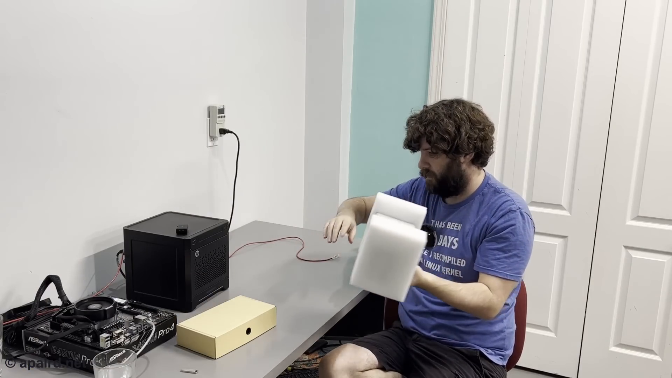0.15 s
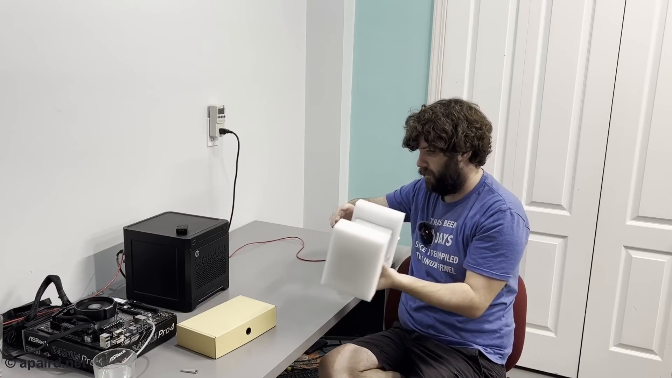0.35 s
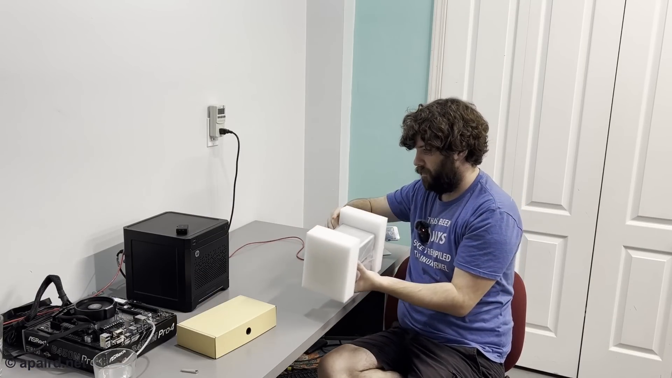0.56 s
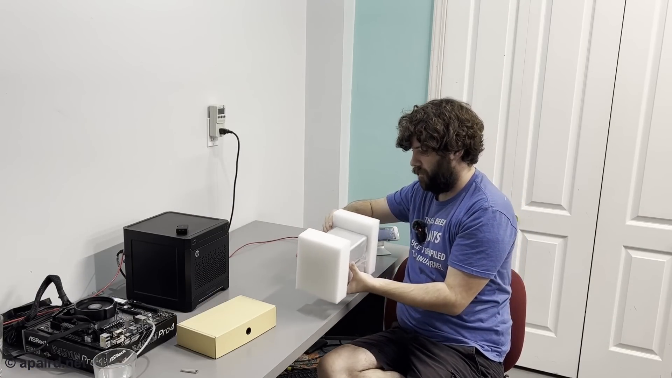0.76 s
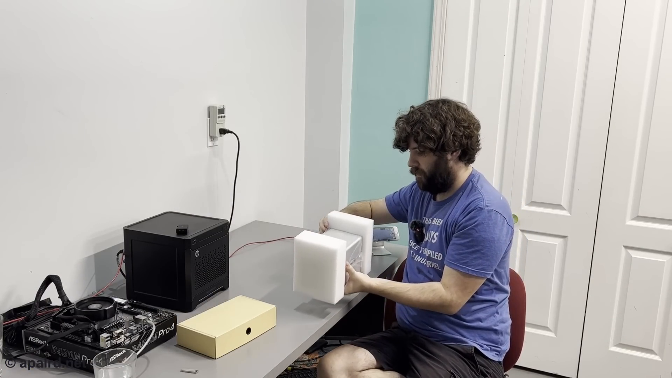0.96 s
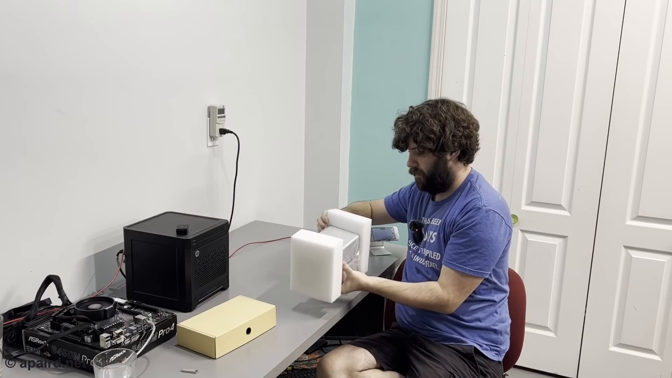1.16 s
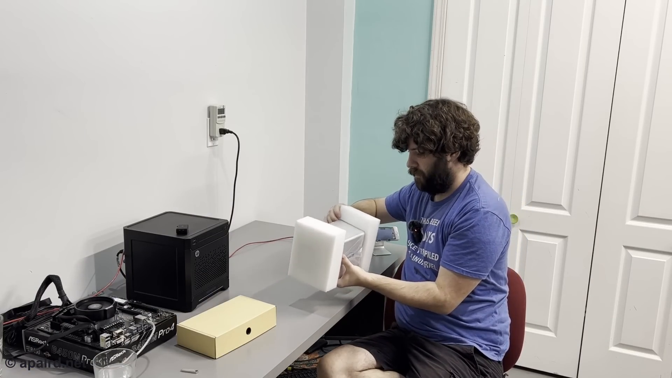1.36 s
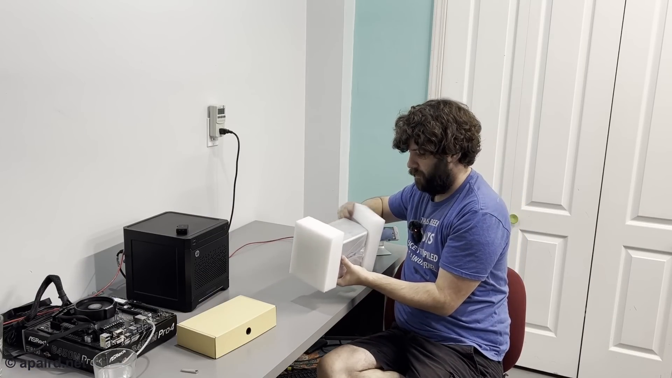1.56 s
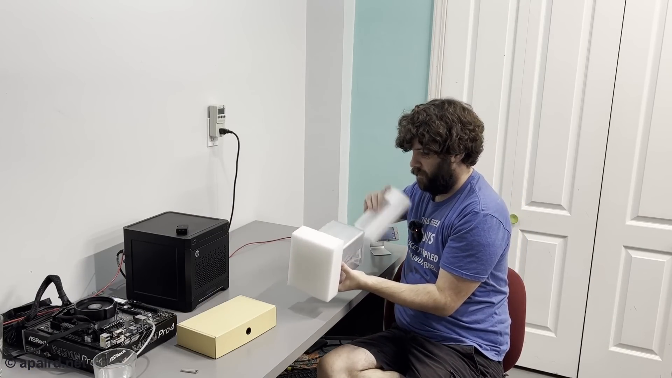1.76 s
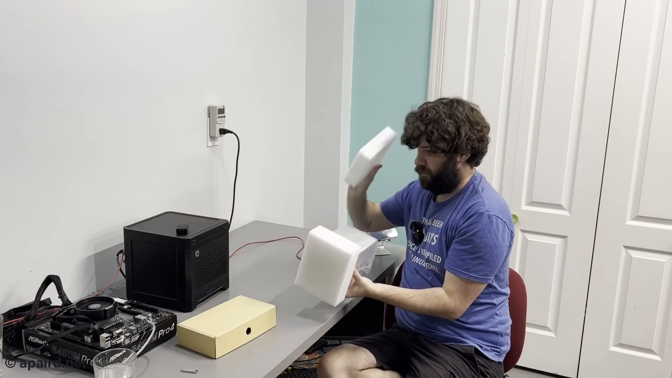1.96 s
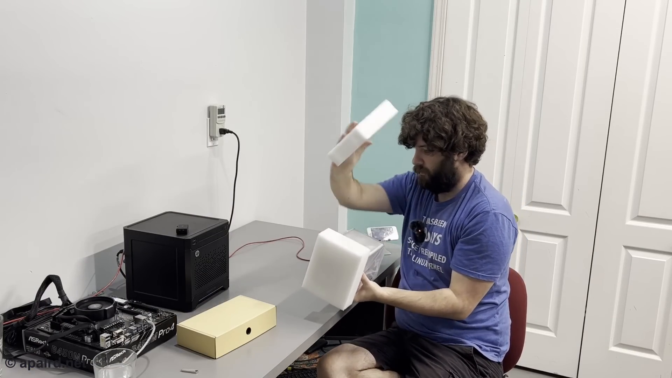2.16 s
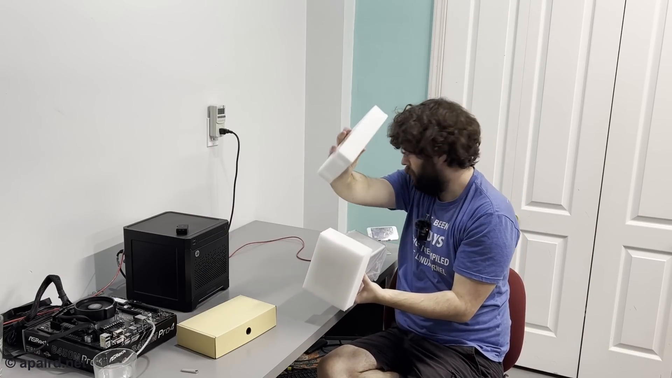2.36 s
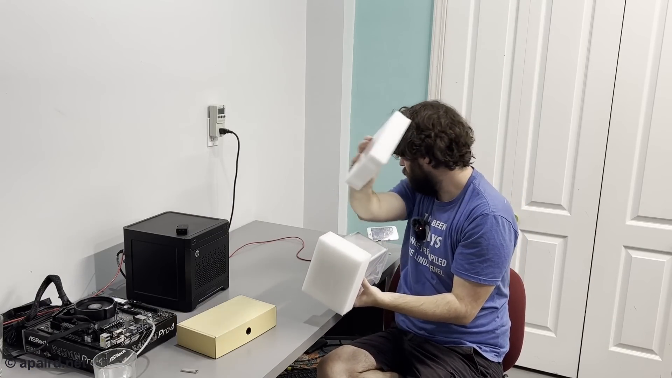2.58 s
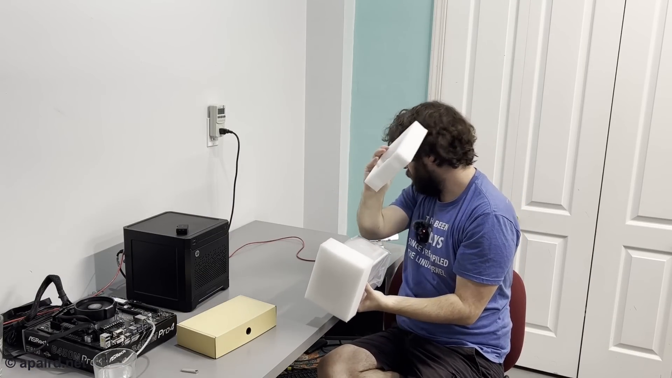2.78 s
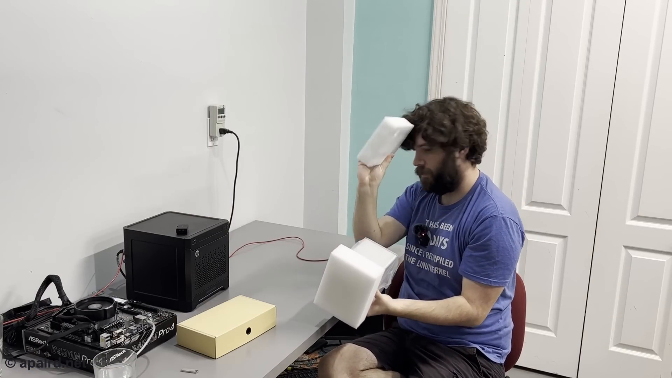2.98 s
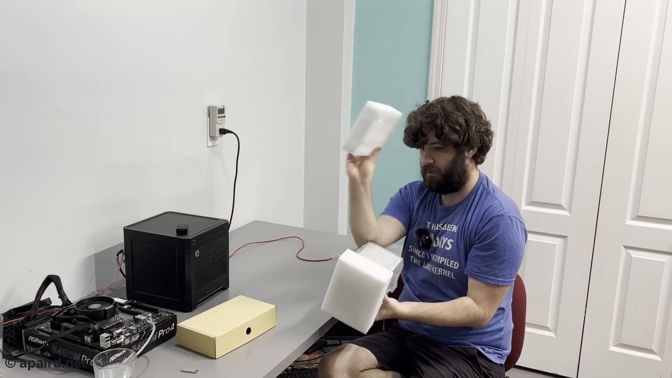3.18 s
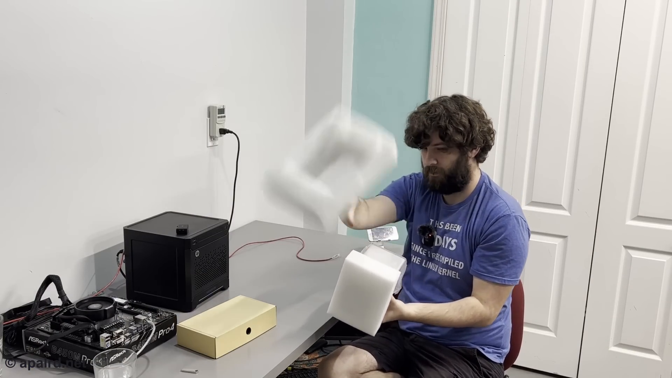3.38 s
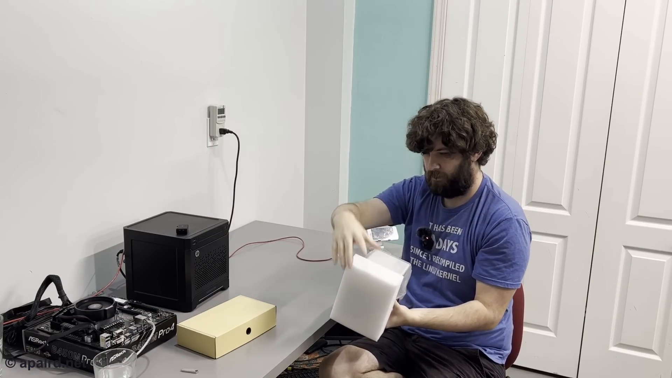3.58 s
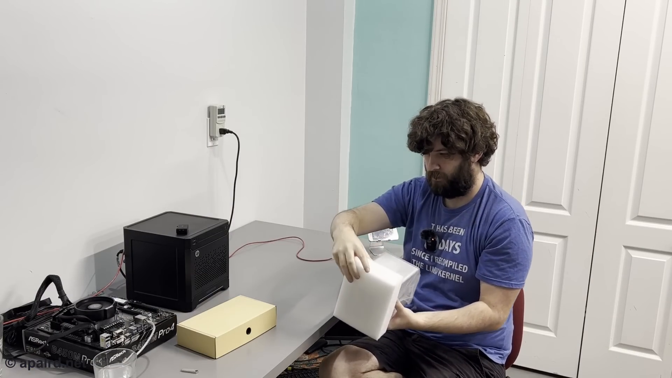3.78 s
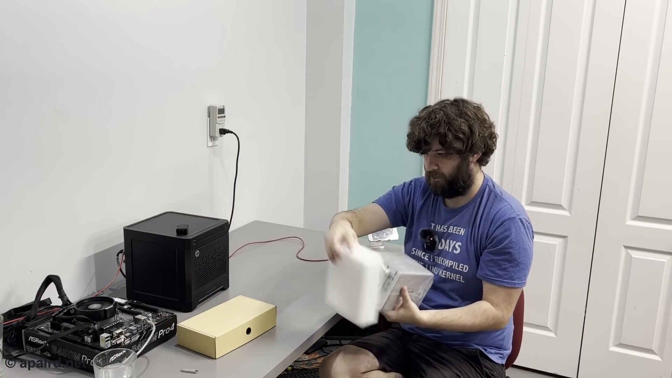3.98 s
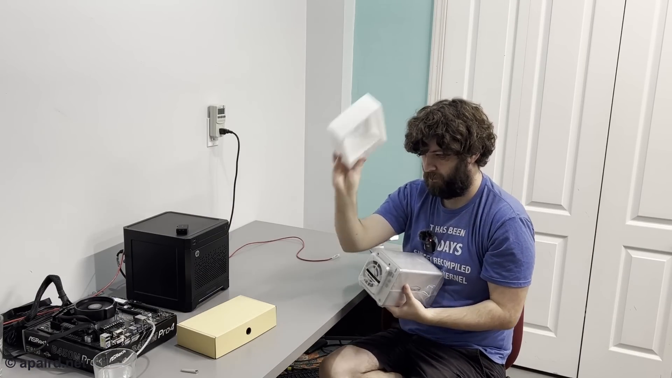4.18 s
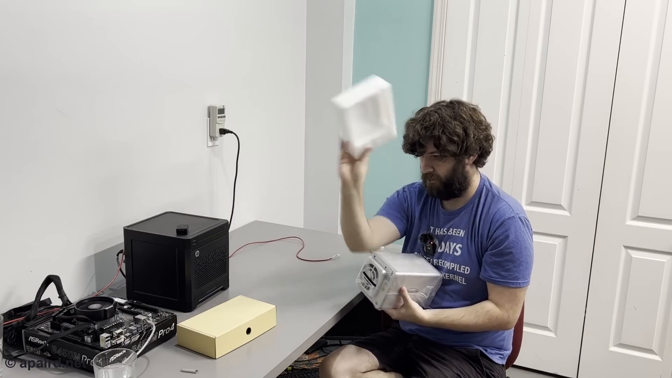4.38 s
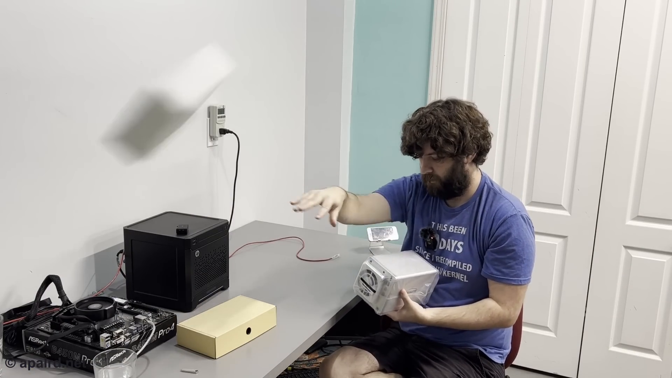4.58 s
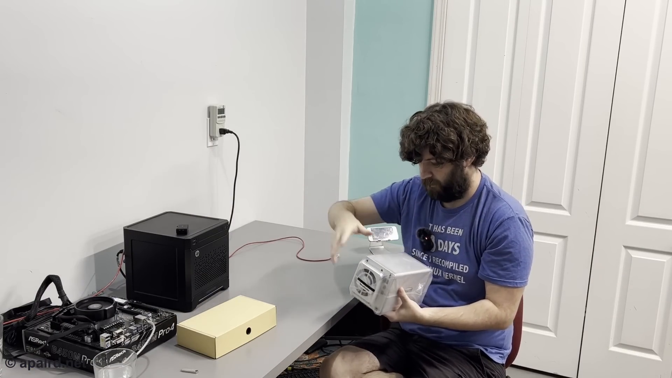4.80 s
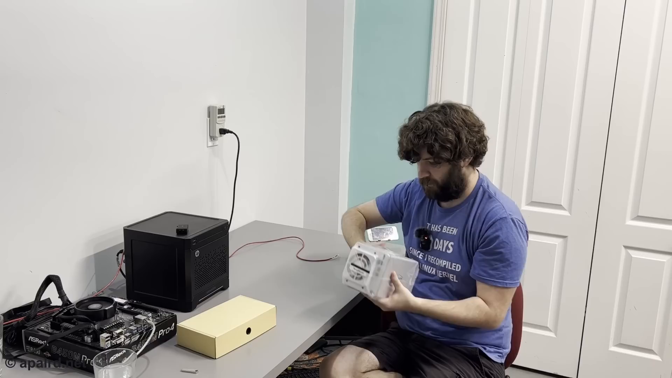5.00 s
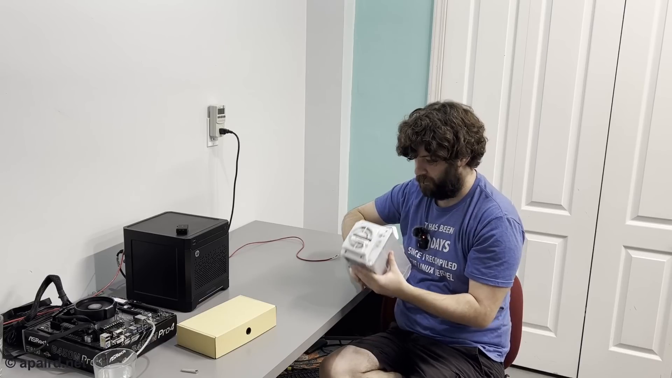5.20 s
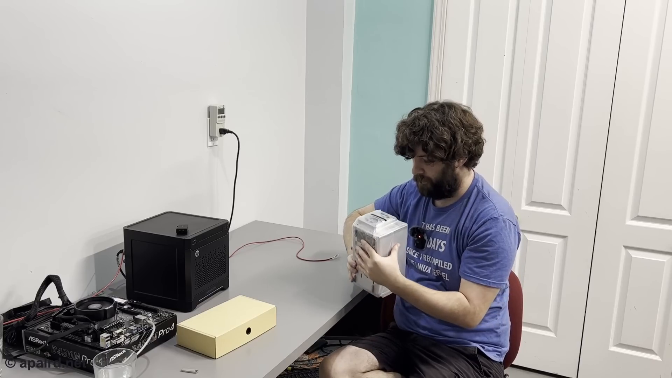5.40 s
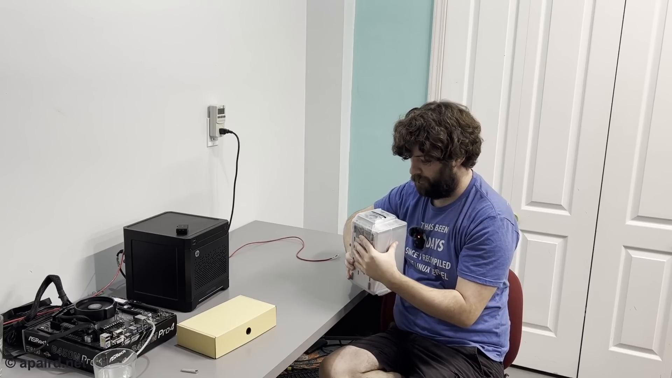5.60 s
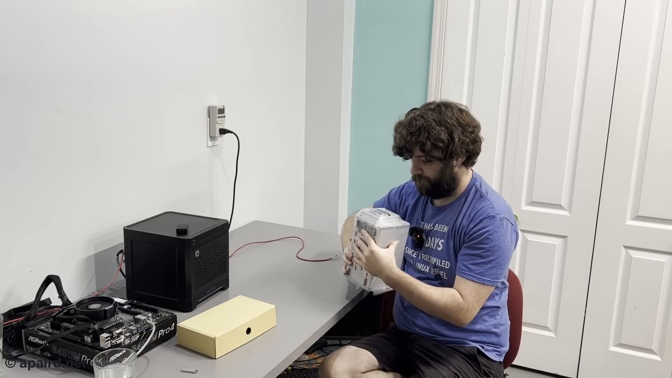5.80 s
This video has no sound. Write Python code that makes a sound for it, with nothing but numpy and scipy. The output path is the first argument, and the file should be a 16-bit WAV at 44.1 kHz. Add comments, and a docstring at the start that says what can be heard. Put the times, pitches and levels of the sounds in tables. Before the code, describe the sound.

Close foam packing rubs, creaks and snaps as it is pulled off a box, while discarded pieces clatter farther away indoors.

```python
"""A small room, where foam end caps are worked off a small box and tossed aside.
Up close the foam snaps under the fingers, thumps as it gives way and pops free with a hollow ring.
Its friction makes rubs, scrapes, rasps and creaks, and it rustles once through hair.
Tossed pieces land and bounce farther off, heard mostly through the room.
Quiet air lies under it all, with a faint high whistle at the end."""
import sys
import numpy as np
from scipy import signal
from scipy.fft import rfft, irfft, next_fast_len
from scipy.io import wavfile
from scipy.ndimage import map_coordinates

SR = 44100
rng = np.random.default_rng(int(sys.argv[2]) if len(sys.argv) > 2 else 0)


def to_wav(sig):
    """Store sig (one row per channel, or 1-D mono) as 16-bit WAV at the path in sys.argv[1].

    Samples outside -1..1 are clipped; the rate is SR.
    """
    pcm = np.clip(np.atleast_2d(sig), -1, 1) * 32767
    pcm = np.round(pcm).astype(np.int16)
    wavfile.write(sys.argv[1], SR, pcm.T)  # frames by channels


N = 257896
CLOCK = np.arange(N) / SR
AGE = np.arange(int(.7 * SR)) / SR  # seconds since a hit

# The sharpest snaps of foam and wrapping.
# Each row: start in seconds, level in dB, pitch in Hz, splinter trim in dB.
SNAPS = [(.378, -34.5, 2360, -14), (.66, -49, 2000, -3.5), (.7798, -33.5, 1500, -3.5),
         (0.8197, -28.5, 1400, -10.5), (.819, -27.5, 4940, -14), (.825, -35, 1490, -7),
         (0.9503, -49.5, 1954, -0.5), (0.9941, -49, 3270, -0.5), (1.0536, -37, 5000, -5),
         (1.073, -39, 926, -6), (1.085, -40, 1330, -3), (1.099, -37, 1080, -11), (1.1005, -31, 6000, -10),
         (1.1213, -12, 5040, -16.5), (1.1561, -29, 1820, -18), (1.161, -35, 3400, -5),
         (1.169, -30, 1890, -12), (1.181, -42, 2200, -8), (1.2792, -45.5, 5000, -4.5),
         (1.2876, -40.5, 3500, -4), (1.3318, -37.5, 6140, -5.5), (1.3399, -34, 1500, -7.5),
         (1.4301, -31, 1160, -8.5), (1.431, -34, 4200, -4.5), (1.473, -13.5, 5360, -31),
         (1.4732, -25, 1610, -21), (1.5386, -33.5, 1220, -5.5), (1.612, -20, 1170, -8.5),
         (1.6858, -31, 4300, -7), (1.685, -30, 864, -17), (1.804, -12.5, 4200, -21),
         (1.8026, -25.5, 1280, -3), (1.973, -24, 7900, -4), (1.991, -21, 6600, -9.5),
         (2.118, -22.5, 1110, -26), (3.6217, -47, 3030, -3), (3.886, -24, 4100, -10),
         (4.0333, -28, 6400, -17), (4.1438, -39, 1730, -0.5), (4.157, -29, 7500, -8),
         (4.1656, -18, 1120, -40), (4.165, -23.5, 4600, -6), (4.2135, -24.5, 1842, -10.5),
         (4.231, -25, 3120, -24), (4.254, -13.5, 1810, -13.5), (4.3298, -31.5, 1310, -8.5),
         (4.6674, -31.5, 1384, -26), (4.9715, -12, 6700, -28), (4.989, -30, 4340, -14),
         (5.2094, -23.5, 4200, -33), (5.251, -35.5, 6130, -16.5), (5.6433, -33.5, 4340, -19)]
def snaps(cycles=7, splinter_s=0.0017, skirt_db=3.5, jolt_db=-3, jolt_s=0.0032):
    """A snap rings for a few cycles, sheds a spray of crackle around its pitch and jolts the foam."""
    out = np.zeros(N)
    t = AGE[:SR // 10]
    for s, db, hz, splinter_db in SNAPS + crinkles():
        spray = filtered(rng.standard_normal(len(t)), lambda f: amp(-skirt_db * octaves(f, hz) ** 2))
        spray = unit(spray) * np.exp(-t / splinter_s)
        burst = rng.standard_normal(len(t)) * np.exp(-t / jolt_s)
        jolt = resonant(burst, RUB_BODY, tilt=1, ripple_db=3)
        add(out, s, amp(db + 4) * ring(hz, cycles / hz, attack=.5 / hz, phase=np.pi / 2))
        add(out, s, amp(db + splinter_db) * (spray + amp(jolt_db) * jolt))
    return out


# Spells of finger pressure. Each row: start and end in seconds, typical level in dB.
CRINKLES = [(1.062, 1.197, -44), (1.432, 1.556, -51), (4.015, 4.076, -41), (4.152, 4.2, -38.5)]
def crinkles(per_s=110, centre_hz=4040, spread_db=5, splinter_db=-6.5):
    """Pressing fingers set off small snaps at uneven intervals: extra rows for snaps()."""
    rows = []
    for start, end, db in CRINKLES:
        for k, (nudge, loudness, octave) in enumerate(rng.uniform(-1, 1, size=(16, 3))):
            s = start + (k + .5 + .5 * nudge) / per_s
            if s < end:
                rows.append((s, db + spread_db * loudness, centre_hz * 2 ** octave, splinter_db))
    return rows


# Soft thumps. Each row: start in seconds, level in dB, pitch in Hz.
THUMPS = [(0.819, -27, 370), (1.281, -31, 850), (1.34, -34, 840), (1.492, -26, 834), (1.592, -29.5, 186),
          (1.61, -17.5, 166), (1.616, -22.5, 330), (1.685, -20, 333), (1.726, -25, 141),
          (1.752, -26, 107.1), (1.79, -18, 203), (1.804, -18.5, 110), (3.721, -38, 154),
          (3.812, -29.5, 214), (3.96, -31, 600), (3.977, -27, 860), (4.019, -37, 430), (4.0595, -23, 850),
          (4.074, -23.5, 277), (5.011, -38.5, 388), (5.781, -34, 370), (5.838, -29.5, 424)]
def thumps(cycles=6.4):
    """Foam and box shift with a dull thump that dies in a few cycles, so low ones last longer."""
    out = np.zeros(N)
    for s, db, hz in THUMPS:
        add(out, s, amp(db + 3.5) * ring(hz, t60=cycles / hz, attack=0.001))
    return out


# The cap's knocks. Each row: start in seconds, level in dB, brightness in dB per octave.
POPS = [(1.9739, -17, 3), (1.98, -24.5, -2.5), (1.9894, -26, -6), (1.998, -21.5, -1.5), (2.094, -38.5, -4),
        (2.1156, -27, -0.5)]
# The cap's modes. Each row: pitch in Hz, level in dB, t60 in seconds.
CAP_MODES = [(115.8, -15, 0.22), (178.5, -14, 0.25), (270, -19, 0.28), (420, 0, 0.099), (493, -0.5, 0.073),
             (613, 3, 0.083), (743, -1.5, 0.095), (1064, 4, 0.049), (1480, 1, .029), (1620, -0.5, .022),
             (3210, -19, 0.068), (3600, -13.5, 0.03)]
def pops(hollow_db=-7, crunch_db=-11, crunch_s=0.014):
    """The cap springs free and knocks: a rough hollow ring with a short crunch."""
    out = np.zeros(N)
    for s, db, tilt in POPS:
        hollow = struck(CAP_MODES, scatter_db=2, attack=0.001, tilt=tilt)
        hollow *= grainy(len(AGE), rate=316, depth_db=1.5)
        crunch = noise(CLATTER, len(AGE), tilt=-0.16) * np.exp(-AGE / crunch_s)
        add(out, s, amp(db + hollow_db) * hollow + amp(db + crunch_db) * crunch)
    return out


# Low after-rings. Each row: start in seconds, level in dB, pitch in Hz.
SWAYS = [(1.928, -32, 108.3), (2.103, -35.5, 114.5), (4.015, -38, 159.5), (4.06, -36, 121.6),
         (4.122, -33, 192.8)]
def sways():
    """A freed cap sways in its low bending modes."""
    out = np.zeros(N)
    for s, db, hz in SWAYS:
        add(out, s, amp(db) * ring(hz, t60=0.31, attack=0.001))
    return out


# Hand strokes. Each row: peak time, rise and fall in seconds, body and hiss levels in dB.
STROKES = [(0.829, 0.145, 0.089, -50, -57), (1.121, 0.34, 0.25, -56, -57.5),
           (1.49, 0.037, 0.24, -53, -74.5), (1.819, .62, 0.42, -42.5, -46.5),
           (2.08, 0.12, 0.25, -58.5, -70), (2.918, 0.69, 0.31, -59, -67), (3.05, 0.23, 0.22, -65, -66),
           (3.229, 0.22, 0.13, -58.5, -59.5), (3.644, 0.019, 0.71, -51, -57), (3.82, 0.12, .2, -73, -56),
           (3.91, 0.2, 0.23, -45.5, -46.5), (4.08, 0.34, 0.39, -43, -55.5),
           (4.429, 0.057, 0.14, -45.5, -53.5), (4.78, 0.23, 0.61, -70, -74),
           (5.117, 0.0077, 0.13, -50, -47.5)]
# EQ of the rub's body and of its hiss. Each row: frequency in Hz, level in dB.
RUB_BODY = [(30, -49.5), (100, -5.5), (250, 1.5), (850, -6.5), (2000, -10.5), (4000, -20.5), (9000, -38)]
RUB_HISS = [(1200, -34.5), (3000, -5), (5500, 1), (9000, -2.5), (13000, -7.5), (16000, -14.5)]
def rubbing(swell_db=24.5):
    """Foam slides over box, hands and hair: a soft body under a crackly hiss, swelling with each stroke."""
    body_power, hiss_power = np.zeros(N), np.zeros(N)
    for s, rise, fall, body_db, hiss_db in STROKES:
        t = CLOCK - s
        from_peak = np.where(t < 0, -t / rise, t / fall)
        swell = amp(-swell_db * np.minimum(from_peak, 10))
        body_power += (amp(body_db) * swell) ** 2
        hiss_power += (amp(hiss_db) * swell) ** 2
    grip = grainy(N, rate=120, depth_db=2.5)
    body_slips = np.sqrt(body_power) * grip * crackle(N, rate=460, depth_db=2)
    body = resonant(body_slips, RUB_BODY, ripple_db=2.5)
    hiss_slips = np.sqrt(hiss_power) * grip * crackle(N, rate=1100, depth_db=2)
    return body + resonant(hiss_slips, RUB_HISS, ripple_db=-1)


# Quick scrapes on the box.
# Each row: peak time and fall in seconds, level in dB, brightness in dB per octave.
SCRAPES = [(1.081, 0.037, -51, -2), (1.135, 0.034, -45.5, 2), (1.343, 0.0084, -39, -0.5),
           (1.436, 0.0073, -44.5, 0.5), (1.596, 0.016, -37, -0.5), (1.611, 0.0038, -26, -0.5),
           (1.622, .015, -40, -8), (1.724, 0.014, -33, -3), (1.752, 0.026, -38, -3),
           (1.829, 0.024, -38, -1), (2.142, 0.04, -43, -6.5), (3.018, .012, -52, 0),
           (3.213, 0.02, -45.5, 0.5), (3.265, 0.0067, -44.5, 2), (3.636, 0.012, -38.5, 0),
           (3.96, 0.0058, -28.5, -3), (3.977, 0.0048, -27.5, -4), (4.061, 0.0057, -28, -2.5),
           (4.068, 0.0066, -45, 3.5), (4.085, 0.017, -39, -3.5), (4.982, 0.02, -45.5, 2.5),
           (5.008, 0.011, -47, 1)]
# EQ of the foam. Each row: frequency in Hz, level in dB.
FOAM_EQ = [(25, -68), (90, -3.5), (200, 0), (650, 0.5), (900, 2.5), (1300, -2), (1950, -5), (3100, -20.5),
           (4600, -11), (7000, -12.5), (12000, -16.5), (16000, -29.5)]
def scrapes(rise_share=0.45):
    """Short tugs: grains of friction swell and let go, exciting new resonances of the foam each time."""
    out = np.zeros(N)
    t = AGE[:SR // 3] - AGE[SR // 10]  # zero at the peak
    for s, fall, db, tilt in SCRAPES:
        swell = np.exp(-np.where(t < 0, -t / rise_share, t) / fall)
        slips = swell * crackle(len(t), rate=900, depth_db=6)
        add(out, s + t[0], amp(db) * resonant(slips, FOAM_EQ, tilt, ripple_db=4))
    return out


# The cap drags off the box.
# Each row: start and length in seconds, level in dB, brightness in dB per octave.
RASPS = [(1.59, .014, -50, 1.5), (1.602, 0.016, -37.5, 3.5), (1.723, .017, -31, -1),
         (1.738, .022, -35.5, 0.5), (1.758, 0.0274, -41.5, 2), (1.809, 0.022, -43, 2),
         (1.825, .027, -41, 2.5), (1.907, .018, -43.5, 6)]
# EQ of the rasp. Each row: frequency in Hz, level in dB.
RASP_EQ = [(200, -21), (900, -6), (1410, -3), (1650, -1), (1900, 5), (2250, -6), (2650, -16), (3100, -8.5),
           (3600, -15), (4500, 0.5), (5400, -15.5), (6300, -6), (7100, -12), (7900, -11), (9200, -16.5),
           (10600, -15.5), (16000, -32)]
def rasps(slips_per_s=1100, spread_db=4):
    """A short, gritty rasp of random slips, coloured by a fixed peaky EQ."""
    out = np.zeros(N)
    for s, length, db, tilt in RASPS:
        size = int(length * SR)
        slips = (rng.random(size) < slips_per_s / SR) * amp(spread_db * rng.standard_normal(size))
        drag = (unit(slips) + .5 * rng.standard_normal(size)) * signal.windows.tukey(size, .3)
        add(out, s, amp(db) * resonant(np.pad(drag, (0, SR // 50)), RASP_EQ, tilt))
    return out


# Creaks. Each row: start and length in seconds, slip rate in Hz, level in dB.
JUDDERS = [(3.955, 0.018, 653.5, -38), (3.968, .017, 849, -31.5), (3.985, 0.025, 845, -44.5),
           (4.015, 0.013, 443, -35), (4.032, 0.03, 499, -39), (4.059, 0.028, 425, -29.5),
           (4.081, 0.021, 537, -32), (4.098, 0.021, 525, -35)]
def judders(jitter=0.089, overtone_db=-11):
    """A tight cap sticks and slips at an uneven rate, giving a short rough groan."""
    out = np.zeros(N)
    for s, length, hz, db in JUDDERS:
        size = int(length * SR)
        phase = 2 * np.pi * np.cumsum(hz * (1 + jitter * wobble(409, size))) / SR
        slips = sum(amp(overtone_db * np.log2(k)) * np.sin(k * phase) for k in range(1, 6))
        groan = unit(slips) * grainy(size, rate=235, depth_db=5.5)
        add(out, s, amp(db) * groan * signal.windows.tukey(size, .5))
    return out


# Tossed pieces land and bounce. Each row: start in seconds, impact level in dB, brightness in
# dB per octave, then the hollow note's pitch in Hz, level in dB and t60 in seconds.
LANDINGS = [(0, -20.5, .5, 186, -16, 0.13), (.001, -30, -3, 334, -21, 0.2), (0.0835, -13, 1, 848, -19, .22),
            (.0895, -13.5, 0.6, 494.6, -10.5, 0.16), (.099, -26, -2, 178.3, -22, 0.46),
            (.113, -27, 0, 1045, -21, 0.28), (.144, -22, -1, 498.4, -24, 0.26),
            (.16, -23, -1.5, 527, -22, 0.37), (.198, -39, -2, 606, -32, 0.34),
            (.491, -31.5, 4, 402.5, -18, 0.3), (.501, -28, -0.5, 527, -28.5, 0.31),
            (0.5034, -30.5, -7.5, 172.5, -24.5, 0.22), (.532, -37, -4, 438, -28.5, 0.29),
            (4.396, -45, 9.5, 926, -42, 0.11), (4.418, -39.5, -3, 460, -45.5, 0.51),
            (4.447, -37.5, -3.5, 329, -43, 0.48), (5.114, -34.5, -4, 165, -19.5, 0.221),
            (5.136, -36.5, 1, 199.7, -22.5, 0.17), (5.152, -38.5, 2.5, 260, -31.5, .15),
            (5.198, -40.5, 3.5, 237, -27, 0.1), (5.325, -48.5, -0.5, 233, -51, .23),
            (5.573, -33.5, -1, 224.4, -26.5, 0.19), (5.585, -40, 2, 173, -31, 0.16)]
# EQ of foam knocking. Each row: frequency in Hz, level in dB.
CLATTER = [(25, -41), (60, -25), (120, -15.5), (180, -6.5), (240, -11.5), (320, -2), (500, -1), (900, -6.5),
           (1800, -13), (2600, -22), (3250, -24.5), (4000, -29.5), (7000, -38), (11000, -49), (16000, -60)]
# Modes of a landing piece. Each row: pitch in Hz, level in dB, t60 in seconds.
SHELL_MODES = [(281.4, -8, 0.35), (346.5, -12, 0.39), (418, -17.5, 0.4), (457.5, 2.5, 0.031),
               (609, -7.5, .4), (710, -12, 0.26), (826, -12.5, 0.36), (873, -8, 0.33), (1056, -8, 0.27),
               (1118, -14.5, 0.22), (1220, -13.5, 0.21), (1520, -12.5, 0.5), (1444, -14, 0.46),
               (1910, -12, 0.17), (2280, -18.5, 0.1)]
def landings(contact_db=4, contact_s=0.003, shell_db=-11, wash_db=-3):
    """A piece lands: a brief clatter smeared by the room, its ringing shell and the note of its hollow."""
    out = np.zeros(N)
    size = len(AGE)
    onset = 1 - np.exp(-AGE / 0.00087)
    envelope = onset * (amp(wash_db) + amp(contact_db) * np.exp(-AGE / contact_s))
    for s, db, tilt, hz, hollow_db, t60 in LANDINGS:
        clatter = room_decay(noise(CLATTER, size, tilt, ripple_db=2)) * envelope
        shell = amp(shell_db) * struck(SHELL_MODES, scatter_db=1, attack=0.0054)
        # Passing reflections shake the note's strength and phase.
        flutter = amp(2 * np.clip(wobble(90, size), -1.5, 1.5))
        hollow = flutter * ring(hz, t60, attack=0.0025, phase=.3 * wobble(70, size))
        add(out, s, amp(db) * (clatter + shell) + amp(hollow_db) * hollow)
    return out


# The cap brushes through hair. Each row: start and length in seconds, level in dB.
BRUSHES = [(2.821, 0.143, -67), (2.927, .175, -56.5), (3.007, .028, -51.5)]
# EQ of the rustle. Each row: frequency in Hz, level in dB.
HAIR_EQ = [(200, -13.5), (600, -3), (880, 9), (1300, -9), (2100, -2), (3300, -9), (6000, -7), (9000, 0.5),
           (12000, -1.5), (16000, -7.5)]
def hair():
    """Many hairs slide over the foam at once: an even, fine rustle."""
    out = np.zeros(N)
    for s, length, db in BRUSHES:
        size = int(length * SR)
        rustle = resonant(crackle(size, rate=1200, depth_db=3.5), HAIR_EQ)
        add(out, s, amp(db) * rustle * signal.windows.tukey(size, .4))
    return out


# The whistle's arc. Each row: time in seconds, pitch in Hz, level in dB.
WHISTLE = [(5.645, 12100, -81.5), (5.68, 13250, -69), (5.73, 13700, -76), (5.77, 13600, -72),
           (5.81, 12300, -73), (5.85, 12600, -82)]
def whistle(waver_hz=50):
    """A thin, faint whistle arches high in the treble."""
    times, pitches, levels = np.transpose(WHISTLE)
    hz = np.interp(CLOCK, times, pitches) + waver_hz * wobble(300, N)
    gain = (CLOCK > times[0]) * amp(np.interp(CLOCK, times, levels))
    return gain * unit(np.sin(2 * np.pi * np.cumsum(hz) / SR))


# EQ of the room tone. Each row: frequency in Hz, level in dB.
AIR_EQ = [(10, -41.5), (25, -9.5), (55, -9.5), (100, -7.5), (150, -11.5), (220, -6), (320, -14.5),
          (460, -15), (1200, -23), (3000, -30), (7500, -33), (16000, -38.5)]
def air():
    """The quiet air of the room: steady, bass-heavy noise."""
    return amp(-60.5) * noise(AIR_EQ, N)


# The room's reverb time. Each row: frequency in Hz, t60 in seconds.
ROOM_T60 = [(80, 0.87), (200, 0.49), (600, 0.37), (2000, 0.35), (6000, 0.29), (14000, 0.43)]
def room_decay(x):
    """Each frequency of x fades at the pace of the room."""
    hz, t, spectra = signal.stft(x, SR, nperseg=256)
    fade = amp(-60 * t / along(ROOM_T60, hz)[:, None])
    return signal.istft(spectra * fade, SR, nperseg=256)[1][:len(x)]


def reverberant(x, wet_db, tilt=0):
    """The near sound with the answer of the walls, tilted in dB per octave."""
    wall_eq = [(60, -23), (300, -2.5), (3000, -3), (15000, -12)]  # Hz, dB
    tail = room_decay(noise(wall_eq, len(AGE), tilt)) * (AGE > .003)
    return x + amp(wet_db) * signal.fftconvolve(x, tail / np.linalg.norm(tail))[:N]


def ring(hz, t60, attack, phase=0):
    """One damped resonance, falling 60 dB in t60 seconds."""
    decay = np.exp(-np.log(1000) * AGE / t60)
    return np.sin(2 * np.pi * hz * AGE + phase) * decay * (1 - np.exp(-AGE / attack))


def struck(modes, scatter_db, attack, tilt=0):
    """A body rings with new mode strengths at each blow; tilt brightens it, in dB per octave."""
    out = np.zeros(len(AGE))
    for hz, db, t60 in modes:
        gain = amp(db + tilt * octaves(hz, 810) + scatter_db * rng.normal())
        out += gain * ring(hz, t60, attack, phase=rng.uniform(0, 2 * np.pi))
    return out


def resonant(x, eq, tilt=0, ripple_db=0):
    """x coloured by this EQ; ripple adds chance resonances some 100 Hz wide."""
    m = 2 * next_fast_len(len(x))
    hz = np.fft.rfftfreq(m, 1 / SR)
    ripple = np.clip(map_coordinates(rng.standard_normal(SR // 200 + 4), [hz / 100]), -2, 2)
    gain = amp(along(eq, hz) + tilt * octaves(hz, 1000) + ripple_db * ripple)
    cepstrum = irfft(np.log(unit(gain)))
    cepstrum[1:m // 2] *= 2  # minimum phase: the filter rings after each impulse, never before
    cepstrum[m // 2 + 1:] = 0
    return irfft(rfft(x, m) * np.exp(rfft(cepstrum)), m)[:len(x)]


def noise(eq, size, tilt=0, ripple_db=0):
    """Coloured noise of rms 1."""
    return unit(resonant(rng.standard_normal(size), eq, tilt, ripple_db))


def crackle(size, rate, depth_db):
    """Tiny slips of foam cells: white noise bunched into grains."""
    return rng.standard_normal(size) * grainy(size, rate, depth_db)


def grainy(size, rate, depth_db):
    """A spiky random gain of rms 1."""
    return unit(amp(depth_db * np.clip(wobble(rate, size), -2, 2)))


def wobble(rate, size):
    """A smooth random curve, rate knots a second."""
    knots = rng.standard_normal(int(size * rate / SR) + 4)
    return map_coordinates(knots, [np.arange(size) * rate / SR])


def filtered(x, gain):
    """x shaped by a gain that depends on frequency."""
    m = next_fast_len(len(x) + 4096)
    return irfft(rfft(x, m) * gain(np.fft.rfftfreq(m, 1 / SR)), m)[:len(x)]


def along(points, hz):
    """Read a curve of (Hz, value) points on a log frequency axis."""
    freqs, values = np.transpose(points)
    return np.interp(np.log(hz + 1), np.log(freqs + 1), values)


def octaves(hz, centre_hz):
    """Rough distance from a centre in octaves, finite at 0 Hz."""
    return np.log2((hz + 20) / centre_hz)


def amp(db):
    """Decibels to gain."""
    return 10 ** (np.asarray(db) / 20)


def unit(x):
    """Scaled to rms 1."""
    return x / np.sqrt(np.mean(x ** 2) + 1e-20)


def add(track, s, sound):
    """Mix a sound in at s seconds."""
    part = track[max(round(s * SR), 0):][:len(sound)]
    part += sound[:len(part)]


def scene():
    """Near handling, far landings and the quiet air of the room, in mono."""
    near = reverberant(snaps(), wet_db=-17)
    near += reverberant(scrapes() + rasps() + judders(), wet_db=-13.5)
    near += reverberant(thumps() + pops() + sways(), wet_db=-18, tilt=-1.2)
    return (near + rubbing() + hair() + landings() + whistle() + air())[None]


def record(dry, low_cut_hz=42, ceiling=.95, top_hz=16000):
    """Thin the deep bass, round the highest peaks and cut the very top."""
    thinned = signal.sosfilt(signal.butter(2, low_cut_hz, "high", fs=SR, output="sos"), dry[0])
    rounded = thinned / (1 + (thinned / ceiling) ** 6) ** (1 / 6)
    return filtered(rounded, lambda hz: hz < top_hz)[None]


dry = scene()
out = record(dry)
to_wav(out)
```